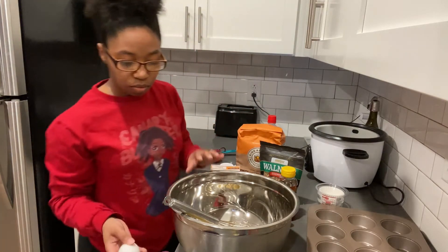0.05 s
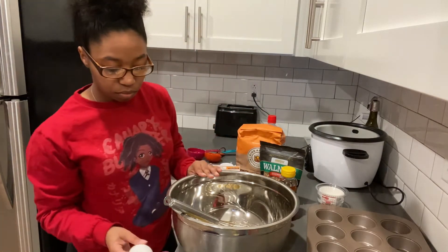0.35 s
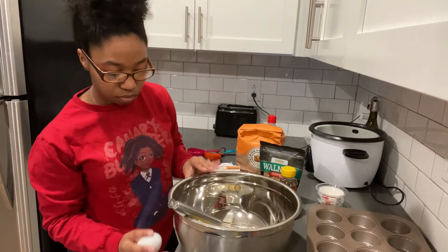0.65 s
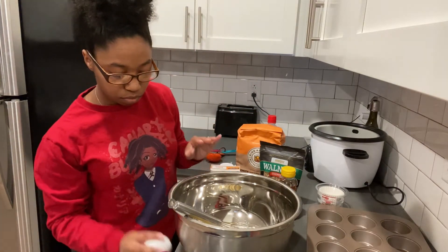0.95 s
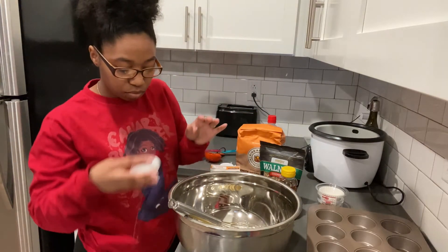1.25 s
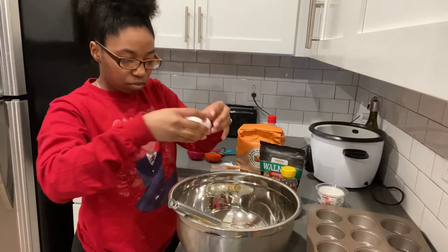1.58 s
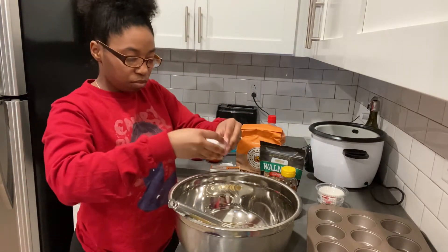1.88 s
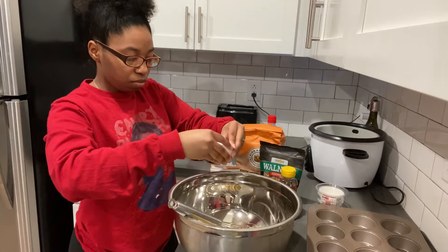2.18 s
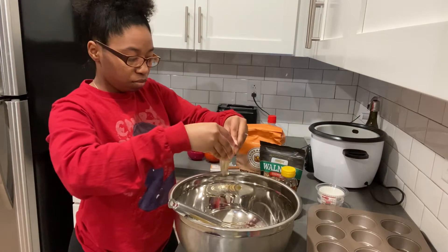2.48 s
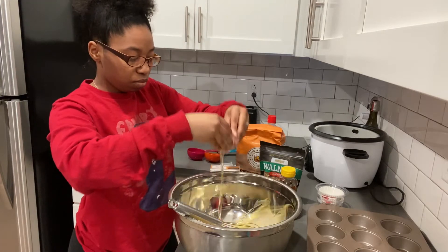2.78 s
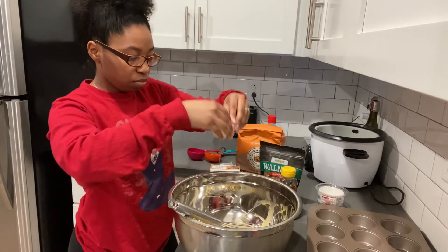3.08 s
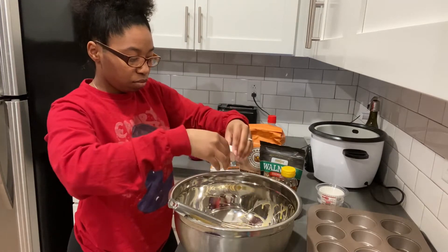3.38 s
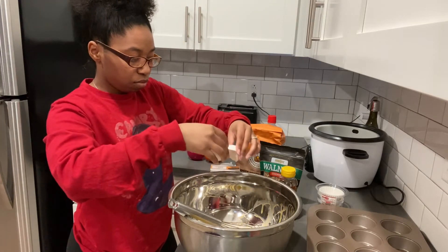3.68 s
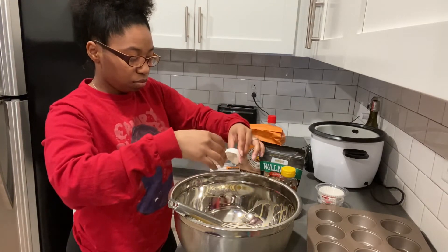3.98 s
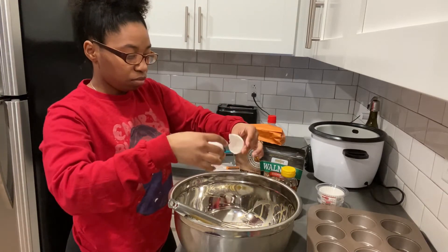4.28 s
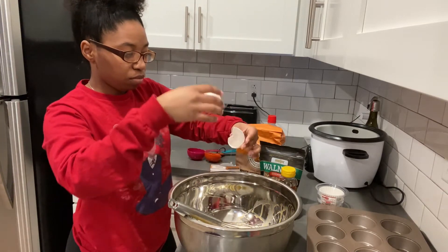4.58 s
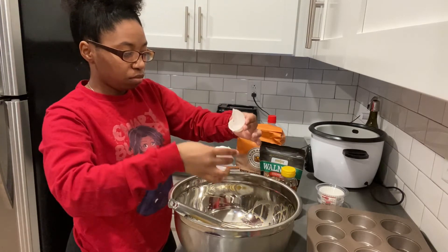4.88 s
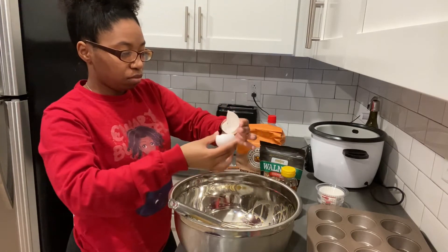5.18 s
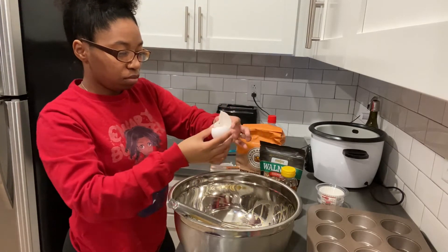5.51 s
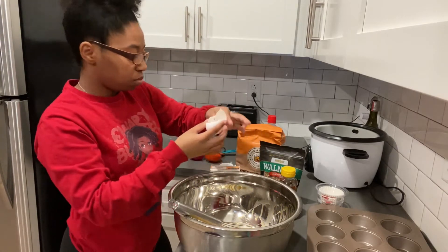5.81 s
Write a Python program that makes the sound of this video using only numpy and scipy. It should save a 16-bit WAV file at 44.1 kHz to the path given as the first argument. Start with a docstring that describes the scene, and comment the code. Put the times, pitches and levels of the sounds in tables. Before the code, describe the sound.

In a small tiled kitchen, a fingernail ticks on a steel bowl and fingers faintly rub its rim. An egg is knocked once, sharply, on the counter edge, and the dented shell pops hollowly. It breaks open with tiny crackles, the egg flops wetly into the bowl and drips, and the empty halves scrape lightly. A refrigerator hums throughout, with the handling fairly near the microphone.

```python
"""An egg is cracked in a small tiled kitchen: its impact on the counter edge excites the modes of counter
and cupboard, and the dented shell pops hollowly. Thumbs break it in runs of tiny fractures that sound its
cavity; the egg flops into a steel bowl and drips, and the empty halves scrape as they are nested.
Beforehand a fingernail ticks on the bowl and fingers rub its rim. The cook's shifting weight rumbles
through the floor, and a refrigerator hums throughout."""
import sys
import numpy as np
from scipy import signal
from scipy.fft import rfft, irfft, next_fast_len
from scipy.io import wavfile
from scipy.ndimage import map_coordinates

SR = 44100
rng = np.random.default_rng(int(sys.argv[2]) if len(sys.argv) > 2 else 0)


def dump(signal):
    """Clip the signal to [-1, 1] and save it as 16-bit WAV at the path in sys.argv[1]."""
    limited = np.clip(np.atleast_2d(signal).T, -1, 1)
    pcm = np.round(limited * 32767).astype(np.int16)
    wavfile.write(sys.argv[1], SR, pcm)


N = 257984
EVENT_T = np.arange(SR * 3 // 4) / SR  # time axis of one event, t/s

# Levels are relative within each table.
# left-right correlation of the diffuse field (f/Hz, correlation)
COHERENCE = [(60, 1), (130, 0.77), (300, 0.59), (450, 0.12), (680, -0.62), (1300, -0.089), (3000, 0.006),
             (15000, 0.23)]
# reverberation time of the kitchen (f/Hz, T60/s)
REVERB_TIME = [(100, 0.64), (400, 0.97), (1000, 0.62), (2800, 0.67), (7000, 0.61), (10000, 0.46),
               (14000, 0.16)]
# feed from the left channel into the right (f/Hz, gain)
CROSSFEED = [(3500, 0), (5500, .45), (7800, .9), (15000, .95)]
# compressor hum (f/Hz, level/dB)
HUM_LINES = [(59.2, -54.5), (96.9, -62.5), (166.9, -58.5), (236.9, -61), (296.1, -55.5), (333.8, -60),
             (532.9, -68.5)]
# whine of the compressor drive (f/Hz, level/dB)
WHINE_LINES = [(1712, -87.5), (3424, -96), (3483, -95), (4620, -101)]
# refrigerator fan (f/Hz, level/dB)
FAN_SPECTRUM = [(30, -27), (58, -0.5), (78, -11), (100, -3), (130, -7.5), (180, -2.5), (260, -9),
                (330, -2.5), (450, -10.5), (620, -19.5), (820, -15.5), (1050, -24.5), (1600, -31),
                (2050, -44.5), (5000, -48.5), (15000, -59.5)]
# shifts of the cook's weight (t/s, level/dB, hold/s)
WEIGHT_SHIFTS = [(2.512, -45, .06), (2.666, -46.5, 0.059), (3.133, -41, .16), (5.515, -35, 0.035),
                 (5.629, -43.5, .02)]
# floor rumble (f/Hz, level/dB)
FLOOR_SPECTRUM = [(20, -11), (45, -9.5), (65, 5.5), (95, -2.5), (150, -13), (400, -68.5)]
# steel bowl (f/Hz, level/dB, T60/s)
BOWL_MODES = [(199, -7.5, 0.82), (448, -2, .25), (822, -14.5, 0.78), (1690, -11, .2), (3710, -9, .35),
              (4127, 0.5, 0.25), (4453, -5.5, .35), (4830, -4.5, .35), (5600, -1.5, .35),
              (5950, -11.5, 0.23)]
# skin sliding on the rim (f/Hz, level/dB)
RUB_SPECTRUM = [(500, -29.5), (680, -12), (760, 11), (880, -16.5), (1500, -23), (2500, -28.5), (7500, -31),
                (13000, -44.5), (16000, -46)]
# fingernail ticks on the rim (t/s, level/dB)
NAIL_TICKS = [(0.239, -28.5), (0.2445, -45.5)]
# nail contact (f/Hz, level/dB)
NAIL_SPECTRUM = [(150, -24.5), (800, 0), (1300, -3), (1800, -3), (2450, -23.5), (3300, -3.5), (4200, 8),
                 (5600, 1), (7800, -12.5), (9500, -33), (12500, -9.5), (15500, -14.5)]
# emptied halves scraping on fingers and each other (t/s, level/dB, T60/s)
HALF_SCRAPES = [(3.15, -55.5, 0.12), (3.219, -43.5, 0.22), (3.257, -39, 0.098), (4.605, -74, 0.027),
                (5.376, -61.5, 0.1), (5.425, -49.5, 0.053), (5.514, -54, 0.026), (5.626, -50, 0.12),
                (5.727, -43.5, 0.072)]
# friction on an emptied half (f/Hz, level/dB)
HALF_SPECTRUM = [(200, -47), (900, -15.5), (1400, -8.5), (2200, 0.5), (2800, -2.5), (3500, -15.5),
                 (4700, -16.5), (6000, -17.5), (15000, -25.5)]
# resonances of an emptied half (f/Hz, level/dB, T60/s)
HALF_MODES = [(1966, -4.5, 0.046), (2238, -2, 0.025), (2904, -13, 0.044), (4610, -13, .03)]
# liquid egg landing (t/s, level/dB, weight level/dB, bubble f/Hz, bubble level/dB re slap)
LANDINGS = [(2.7358, -28.5, 3.5, 2660, -6), (2.746, -34, 4.5, 5950, -12), (2.8831, -35.5, -29, 3440, 2.5),
            (2.886, -41.5, -9, 4400, 4), (2.9, -51, -27, 2350, 6.5), (3.068, -49, -23.5, 5960, -1.5),
            (3.075, -48, -18, 2800, -6.5)]
# wet slap on steel (f/Hz, level/dB)
SLAP_SPECTRUM = [(300, -8.5), (900, -13), (1300, -14.5), (2000, -8.5), (2700, -9), (3400, 0), (4400, -1.5),
                 (6000, 1), (8000, -8), (10000, -14.5), (13000, -12.5), (16000, -26)]
# flop of the yolk (f/Hz, level/dB)
FLOP_SPECTRUM = [(40, -25), (90, 2), (200, -1.5), (430, 7), (600, -1.5), (1200, -13.5), (3000, -47)]
# pops of the dented egg (t/s, level/dB, relative tick level/dB)
DENT_POPS = [(1.033, -41.5, 0), (1.0417, -25, -33), (1.1772, -22, -24), (1.181, -30, -29),
             (1.2, -35.5, -24), (2.556, -46, -6)]
# resonances of the dent (f/Hz, level/dB, T60/s)
DENT_MODES = [(1225, 0, 0.04), (1450, -8, 0.038), (2040, -35, 0.004), (5030, -24.5, 0.015),
              (6440, -2.5, 0.0078)]
# body of the egg (f/Hz, level/dB)
EGG_SPECTRUM = [(100, -7.5), (450, -5.5), (900, -6), (1280, 6), (1580, -9), (2100, -14), (3500, -34),
                (9000, -56)]
# fractures under the thumbs, from hairline ticks to the final break (t/s, level/dB, T60/s)
FRACTURES = [(1.845, -71, 0.015), (1.977, -69, .04), (2.071, -63.5, 0.0048), (2.13, -60.5, 0.0045),
             (2.168, -55.5, 0.061), (2.214, -49.5, .04), (2.229, -37.5, 0.07), (2.278, -38.5, 0.0015),
             (2.41, -51.5, .008), (2.44, -40.5, .035), (2.463, -46, 0.0067), (2.4675, -32, .014),
             (2.551, -54.5, 0.019)]
# hollow of the full shell (f/Hz, level/dB)
CAVITY_SPECTRUM = [(200, -28), (720, 1), (1100, 1.5), (1600, 0.5), (2250, 2), (2900, -2), (3800, -10.5),
                   (6000, -28), (15000, -49.5)]
# breaking edge (f/Hz, level/dB)
SNAP_SPECTRUM = [(500, -43.5), (2500, -12.5), (4000, -6), (5500, 1), (7500, -3), (9000, -4.5),
                 (13000, -6.5), (16000, -4)]
# egg striking the counter (t/s, level/dB)
IMPACTS = [(0.8112, -14.5)]
# shell caving in (f/Hz, level/dB)
CRUSH_SPECTRUM = [(35, -26.5), (75, -5), (180, -6.5), (360, -11.5), (500, -4.5), (620, -7.5), (800, -3),
                  (1200, -11), (1600, -10), (2100, -7.5), (2700, -12), (3300, -16), (5500, -17),
                  (9000, -23.5), (15000, -30.5)]
# counter top and what stands on it (f/Hz, level/dB, T60/s)
COUNTER_MODES = [(445, -8, 0.1), (700, -5.5, 0.18), (812, -0.5, 0.22), (847, -1.5, 0.16),
                 (1160, -3.5, 0.19), (1225.4, 4, 0.075), (1500, -3.5, 0.092), (1800, -12.5, 0.25),
                 (2004, -12, 0.33), (2195, -13.5, 0.2)]
# cupboard under the counter (f/Hz, level/dB, T60/s)
CUPBOARD_MODES = [(84, -4, .25), (169.9, -5.5, 0.52), (187.6, 0.5, 0.24), (236, -1.5, .15)]


def amp(db):
    """Decibel law: 20 dB is a factor of ten in amplitude."""
    return 10 ** (np.asarray(db) / 20)


def unit_rms(x):
    """Power normalisation to an rms of 1."""
    return x / np.sqrt(np.mean(x ** 2) + 1e-20)


def unit_energy(x):
    """Energy normalisation to one millisecond at full level."""
    return x * np.sqrt(SR / 1000 / (np.sum(x ** 2) + 1e-20))


def along(points, hz):
    """Log-frequency interpolation of (f/Hz, value) points."""
    f, value = np.transpose(points)
    return np.interp(np.log(hz + 1), np.log(f + 1), value)


def wobble(rate):
    """Random modulation: a spline through rate knots a second."""
    return map_coordinates(rng.standard_normal(int(N * rate / SR) + 4), [np.arange(N) * rate / SR])


def swell(start, attack, hold, fall_db_per_s):
    """Exponential decay after a linear rise and a hold."""
    t = np.arange(N) / SR - start
    return np.clip(t / attack, 0, 1) * amp(-fall_db_per_s * np.maximum(t - attack - hold, 0))


def diffuse(size, spectrum=None):
    """Diffuse field: noise at two points is coherent in the bass and largely unrelated in the treble."""
    m = next_fast_len(size)
    hz = np.fft.rfftfreq(m, 1 / SR)
    angle = np.arccos(np.clip(along(COHERENCE, hz), -1, 1)) / 2
    gain = amp(along(spectrum, hz)) if spectrum else 1
    noise = rfft(rng.standard_normal((2, m))) * gain
    mid, side = irfft(noise * [np.cos(angle), np.sin(angle)], m)[:, :size]
    return unit_rms(np.array([mid + side, mid - side]))


def burst(spectrum, t60, spiky_db=5, rise=0):
    """Source-filter model: a dying run of uneven impulses drives a minimum-phase filter."""
    size = 4096
    cepstrum = irfft(np.log(amp(along(spectrum, np.fft.rfftfreq(size, 1 / SR)))))
    cepstrum[1:size // 2] *= 2  # folding makes the filter causal
    cepstrum[size // 2 + 1:] = 0
    response = irfft(np.exp(rfft(cepstrum)))
    noise, strength = rng.standard_normal((2, len(EVENT_T)))
    onset = (EVENT_T + 1 / SR) / (EVENT_T + 1 / SR + rise)
    force = noise * onset * amp(spiky_db * strength - 60 * EVENT_T / max(t60, .001))
    return unit_energy(signal.fftconvolve(force, response)[:len(EVENT_T)])


def ring(modes, attack=0.00037):
    """Modal superposition: damped sinusoids, excited a little differently each time."""
    tones = 0
    for hz, db, t60 in modes:
        decay = amp(db + rng.normal() - 60 * EVENT_T / t60)
        tones += decay * np.sin(2 * np.pi * (hz * EVENT_T + rng.random()))
    return unit_energy(tones * (1 - np.exp(-EVENT_T / attack)))


def kitchen(sound, early_db, late_db, early_t60=0.13):
    """Room convolution: direct sound, early reflections off counter and tiles, then reverberation."""
    size = len(EVENT_T)
    hz, t, bands = signal.stft(diffuse(size), SR, nperseg=256)
    bands *= amp(-60 * t / along(REVERB_TIME, hz)[:, None])
    late = signal.istft(bands, SR, nperseg=256)[1][:, :size] * (1 - np.exp(-EVENT_T / 0.0017))
    early = diffuse(size) * amp(3.9 * rng.standard_normal(size) - 60 * EVENT_T / early_t60)
    near = diffuse(size) * amp(-60 * EVENT_T / 0.0038)  # scattered by the bowl and the hands
    direct = np.tile(EVENT_T == 0, (2, 1)) * 1.
    paths = [(-2, direct), (-5, near), (early_db, early), (late_db, late)]
    response = sum(amp(db) * path / np.linalg.norm(path) for db, path in paths)
    return signal.fftconvolve(sound[None], response / np.linalg.norm(response[0]), axes=1)[:, :size]


def add(out, start, sound):
    """Superposition of a stereo sound from start seconds on."""
    part = out[:, round(start * SR):][:, :sound.shape[1]]
    part += sound[:, :part.shape[1]]


def fridge():
    """Line spectrum over broadband noise: unsteady compressor tones, the fan's rush and a faint hiss."""
    t = np.arange(N) / SR
    hum = sum(amp(db + 1.3 * wobble(2.5)) * np.sqrt(2) * np.sin(2 * np.pi * hz * t + .35 * wobble(4.2))
              for hz, db in HUM_LINES)
    whine = sum(amp(db) * np.sqrt(2) * np.sin(2 * np.pi * hz * t + 0.51 * wobble(14))
                for hz, db in WHINE_LINES)
    hiss = diffuse(N, [(2500, -42.5), (3250, -9), (3470, 2), (3750, -32),
                       (4200, -14), (4600, -13.5), (5500, -41.5), (9000, -56.5)])
    return amp(-2) * hum + whine + amp(-52.5) * diffuse(N, FAN_SPECTRUM) + amp(-90) * hiss


def floor_rumble():
    """Structure-borne sound: the floor carries the cook's shifting weight as soft thuds."""
    envelope = sum(amp(db) * swell(start, attack=0.012, hold=hold, fall_db_per_s=208)
                   for start, db, hold in WEIGHT_SHIFTS)
    return amp(-5) * envelope * diffuse(N, FLOOR_SPECTRUM)


def rim_rub():
    """Friction noise: skin drags unevenly on the rim and hums near the bowl's wall mode."""
    stroke = swell(start=0.4, attack=0.072, hold=0.16, fall_db_per_s=220)
    return stroke * amp(-55.5 + 2.9 * wobble(40)) * diffuse(N, RUB_SPECTRUM)


def bowl(contact):
    """Selective excitation: the contact spectrum (f/Hz, level/dB) weights the bowl's modes."""
    return ring([(hz, db + along(contact, hz), t60) for hz, db, t60 in BOWL_MODES])


def fingernail():
    """Impulse excitation: a hard, light contact drives the rim's high modes."""
    out = np.zeros((2, N))
    for start, db in NAIL_TICKS:
        tick = burst(NAIL_SPECTRUM, t60=0.036)
        rim = amp(-7.5) * bowl([(200, -36), (760, 0), (4000, -1), (6000, -6.5)])
        add(out, start, amp(db + 11.5) * kitchen(tick + rim, early_db=8, late_db=2))
    return out


def breaking_edge(t60):
    """Brittle fracture: a crack advances in a run of tiny snaps."""
    return burst(SNAP_SPECTRUM, t60, spiky_db=8.5, rise=t60 * 0.18)


def empty_halves():
    """Forced resonance: friction drives the halves' modes; harder scrapes chip their edges more."""
    out = np.zeros((2, N))
    for start, db, t60 in HALF_SCRAPES:
        drag = burst(HALF_SPECTRUM, t60, spiky_db=5.5, rise=t60 * 0.21)
        resonance = amp(-5) * unit_energy(signal.fftconvolve(drag, ring(HALF_MODES))[:len(EVENT_T)])
        chips = amp(0.2 * (db + 21.5) - 4) * breaking_edge(t60 * 1.13)
        add(out, start, amp(db + 10) * kitchen(drag + resonance + chips, early_db=3, late_db=-4))
    return out


def egg_splats():
    """Liquid impact: a slap and a trapped bubble's resonance; weight adds a flop and a low bowl note."""
    out = np.zeros((2, N))
    for start, db, weight_db, bubble_hz, bubble_db in LANDINGS:
        weight = amp(weight_db - 4.5)
        slap = burst(SLAP_SPECTRUM, t60=0.028, spiky_db=-2)
        bubble = amp(bubble_db) * ring([(bubble_hz, 0, .009)])
        flop = weight * burst(FLOP_SPECTRUM, t60=0.043)
        wet = kitchen(slap + bubble + flop, early_db=-2.5, late_db=-5)
        note = weight * bowl([(200, 12.5), (420, 6.5), (760, -11), (4000, -47), (6000, -3)])
        add(out, start, amp(db + 4.5) * (wet + note))
    return out


def dent_pops():
    """Elastic snap-through: the dent springs as the egg is handled, giving short, hollow notes."""
    out = np.zeros((2, N))
    for start, db, tick_db in DENT_POPS:
        note = amp(-7.5) * ring(DENT_MODES, attack=0.00018)
        body = amp(-2.5) * burst(EGG_SPECTRUM, t60=0.015)
        tick = amp(tick_db) * burst(SNAP_SPECTRUM, t60=0.0077)
        add(out, start, amp(db + 7) * kitchen(note + body + tick, early_db=-2.5, late_db=-6))
    return out


def cupped_shell(centre_hz=2087, log_spread=0.057):
    """Cavity resonance: one short note whose pitch varies with the grip."""
    hz = centre_hz * np.exp(log_spread * rng.normal())
    return ring([(hz, 0, .022)], attack=0.0011)


def shell_cracks():
    """Acoustic emission: hairline cracks only tick; stronger ones also sound the full egg's hollow."""
    out = np.zeros((2, N))
    for start, db, t60 in FRACTURES:
        cavity = amp(-3) * burst(CAVITY_SPECTRUM, t60, spiky_db=2.5, rise=t60 * .2)
        note = amp(-9) * cupped_shell()
        hollow_db = 2 + 0.37 * (db + 41)
        crack = amp(hollow_db) * (cavity + note) + breaking_edge(t60)
        add(out, start, amp(db + 8.5) * kitchen(crack, early_db=1, late_db=-3.5))
    return out


def egg_knock():
    """Inelastic impact: the shell caves in, the counter rings and the cupboard's boom builds after it."""
    out = np.zeros((2, N))
    for start, db in IMPACTS:
        crunch = amp(4.5) * kitchen(burst(CRUSH_SPECTRUM, t60=.02, spiky_db=10), early_db=-1, late_db=1)
        crack = amp(-1.5) * kitchen(burst(SNAP_SPECTRUM, t60=0.004), early_db=-4, late_db=-3.5)
        counter = ring(COUNTER_MODES, attack=0.0018)
        echoes = amp(-7.5) * kitchen(counter, early_db=12, late_db=4.5)
        boom = amp(-7.5) * ring(CUPBOARD_MODES, attack=0.013)
        add(out, start, amp(db) * (crunch + crack + counter + echoes + boom))
    return out


def scene():
    """Linear superposition of all sources; a level difference sets the handling slightly to the right."""
    handling = fingernail() + rim_rub() + egg_knock() + dent_pops()
    handling += shell_cracks() + empty_halves() + egg_splats()
    return handling * amp([[-.4], [.4]]) + floor_rumble() + fridge()


def record(dry):
    """Antiphase crossfeed: a delayed, inverted left widens the treble; a steep low-pass follows."""
    lag_s, cutoff_hz = .00019, 15950
    m = next_fast_len(N + SR // 2)
    hz = np.fft.rfftfreq(m, 1 / SR)
    left, right = rfft(dry, m)
    share = np.clip(along(CROSSFEED, hz), 0, 1)
    delayed_left = left * np.exp(-2j * np.pi * hz * lag_s)
    right = np.sqrt(1 - share ** 2) * right - share * delayed_left
    lowpass = 1 / np.sqrt(1 + (hz / cutoff_hz) ** 160)
    return irfft(np.array([left, right]) * lowpass, m)[:, :N]


dry = scene()
out = record(dry)
dump(out)
```